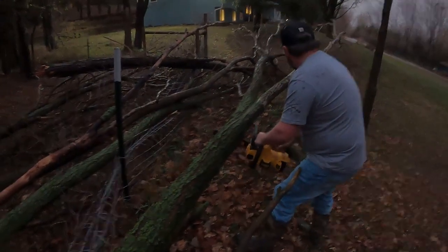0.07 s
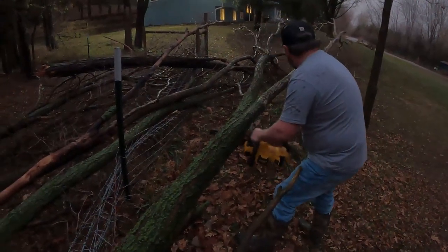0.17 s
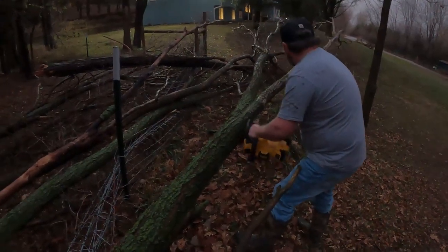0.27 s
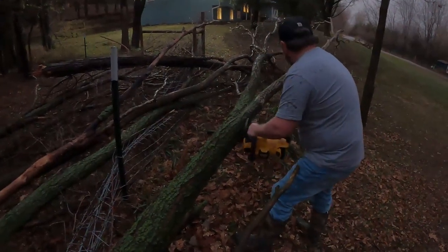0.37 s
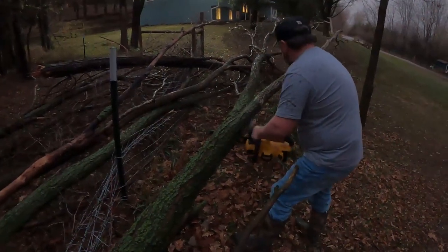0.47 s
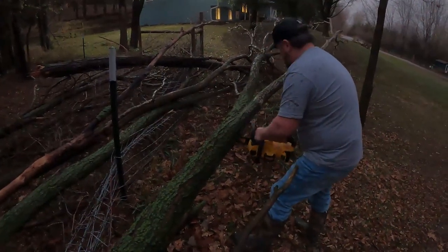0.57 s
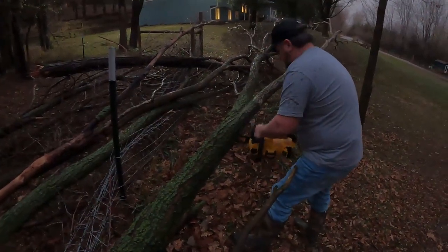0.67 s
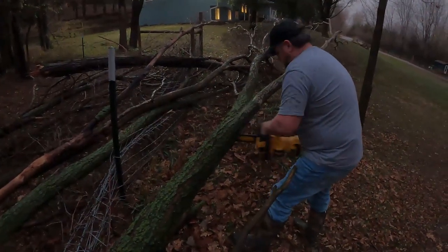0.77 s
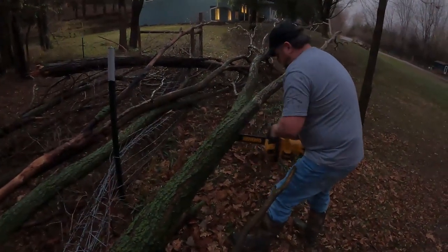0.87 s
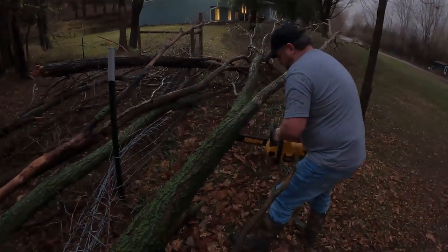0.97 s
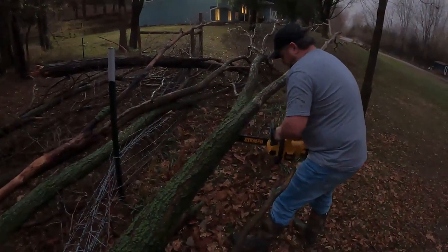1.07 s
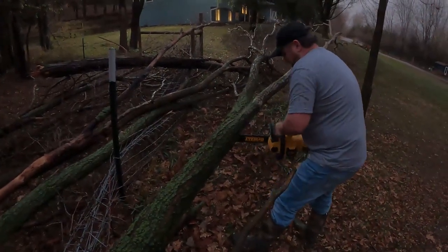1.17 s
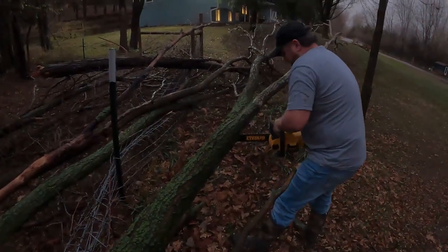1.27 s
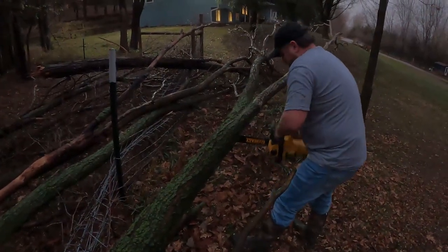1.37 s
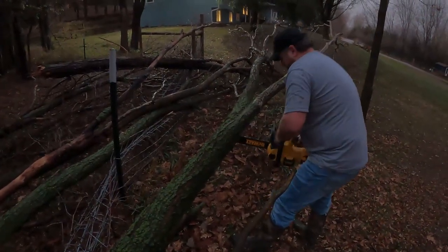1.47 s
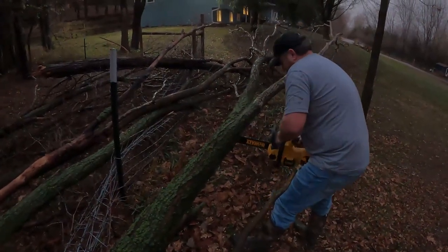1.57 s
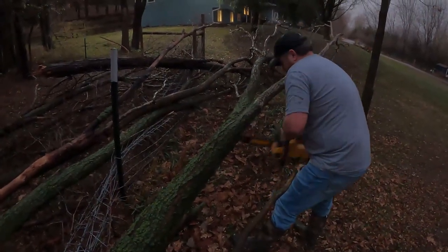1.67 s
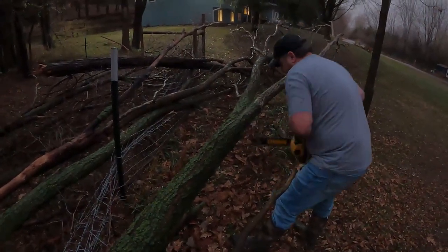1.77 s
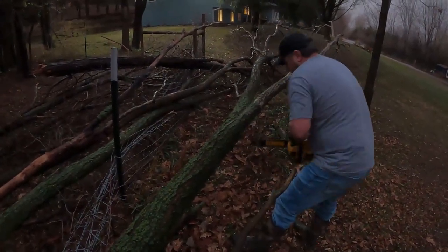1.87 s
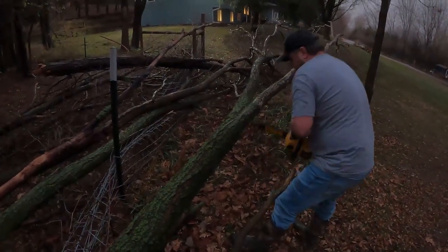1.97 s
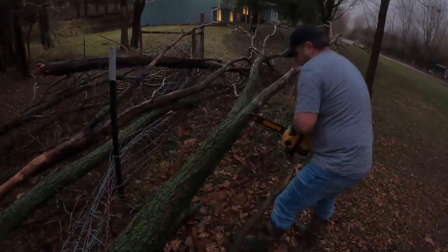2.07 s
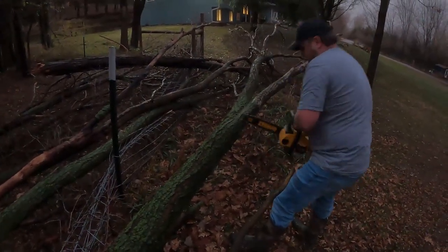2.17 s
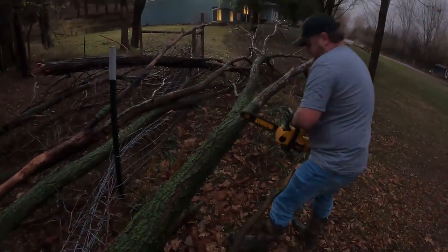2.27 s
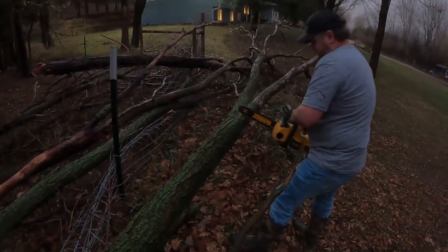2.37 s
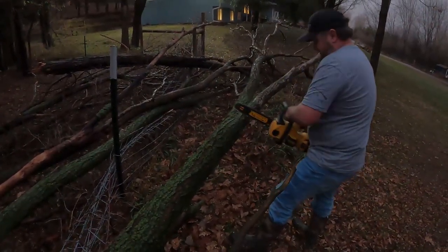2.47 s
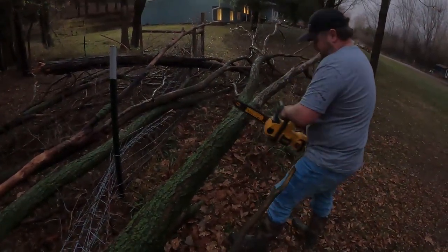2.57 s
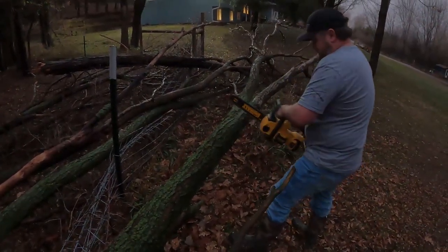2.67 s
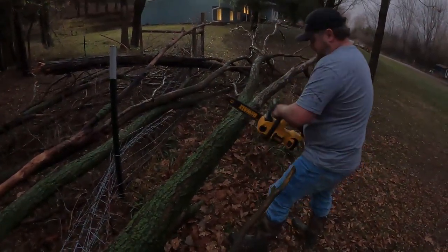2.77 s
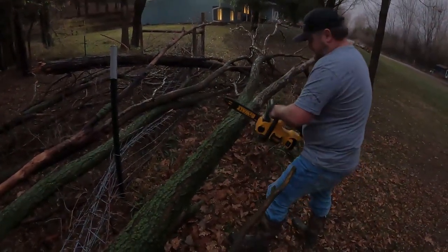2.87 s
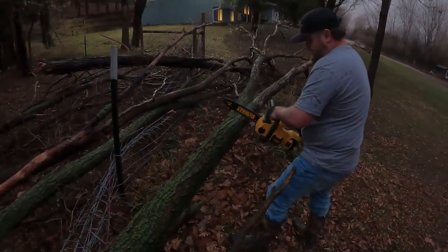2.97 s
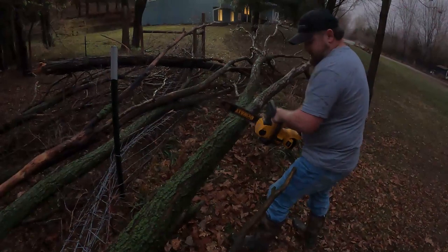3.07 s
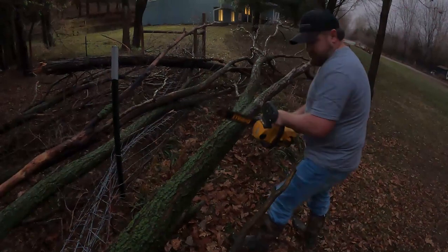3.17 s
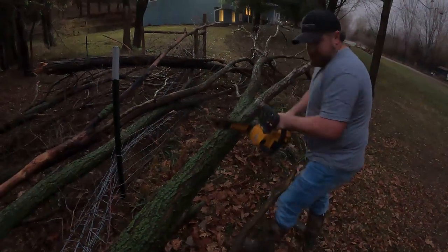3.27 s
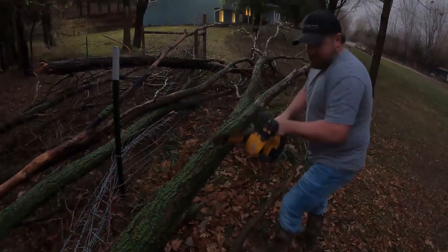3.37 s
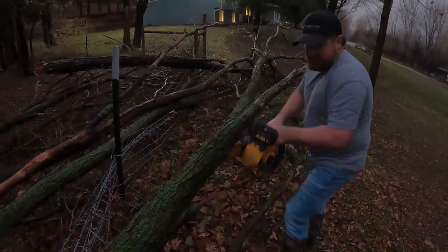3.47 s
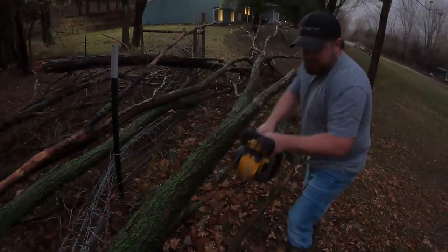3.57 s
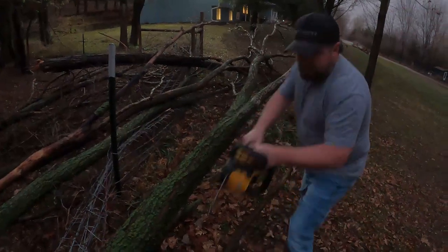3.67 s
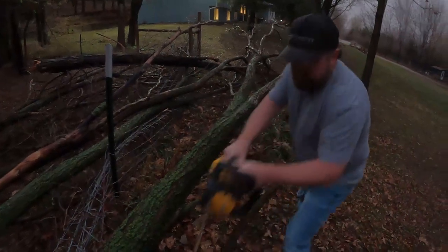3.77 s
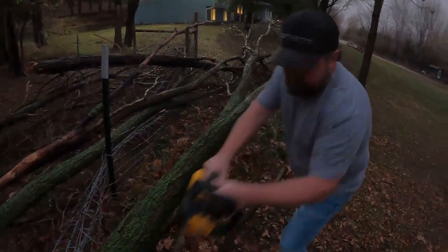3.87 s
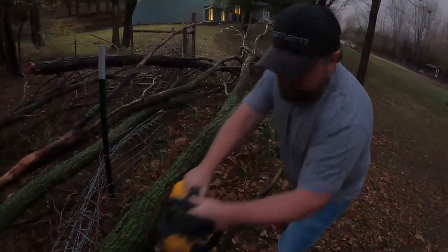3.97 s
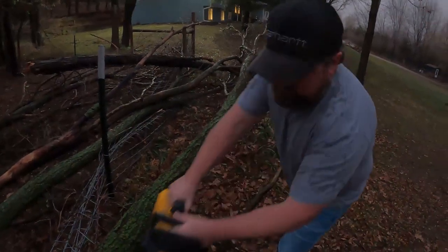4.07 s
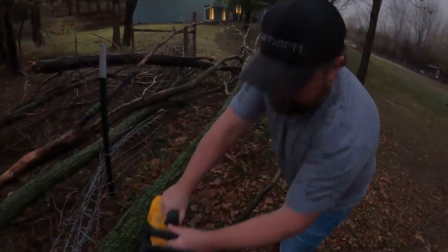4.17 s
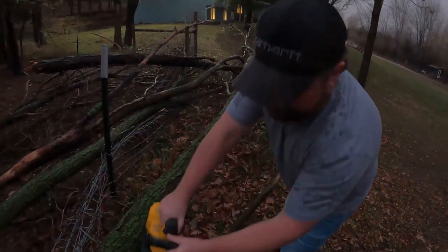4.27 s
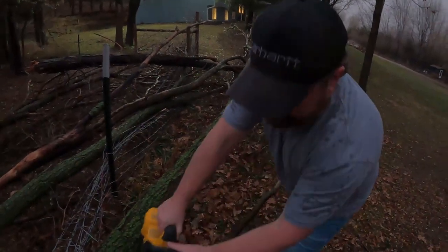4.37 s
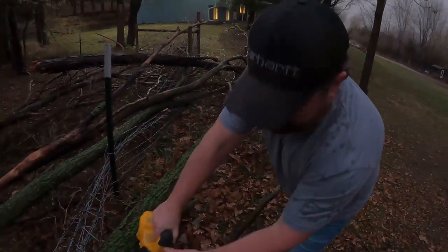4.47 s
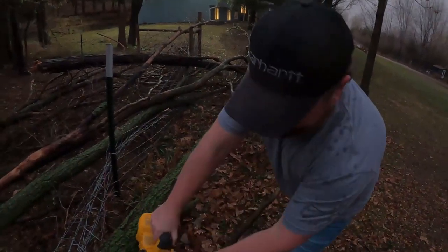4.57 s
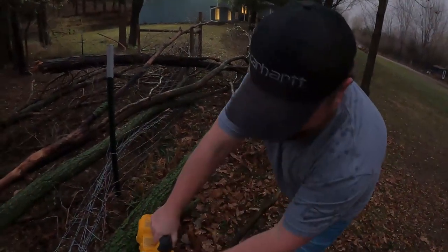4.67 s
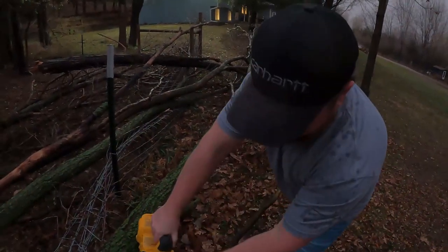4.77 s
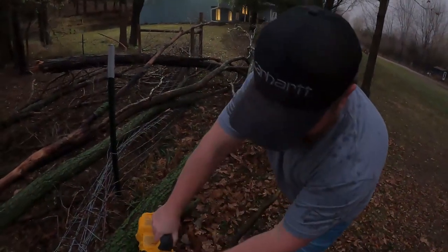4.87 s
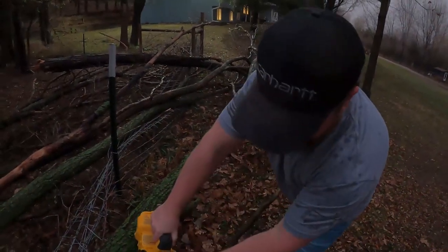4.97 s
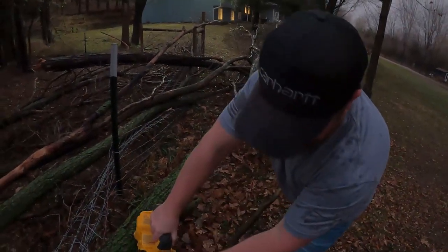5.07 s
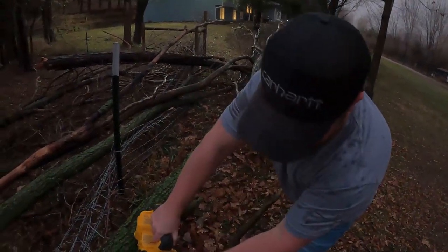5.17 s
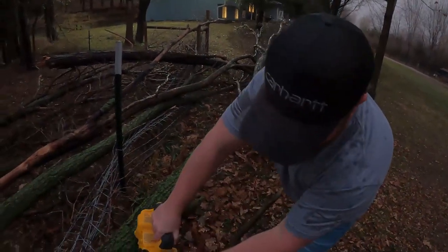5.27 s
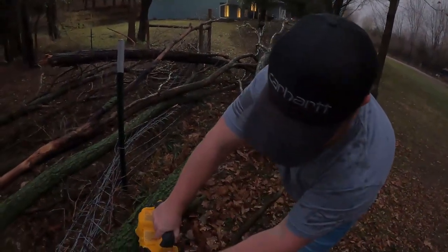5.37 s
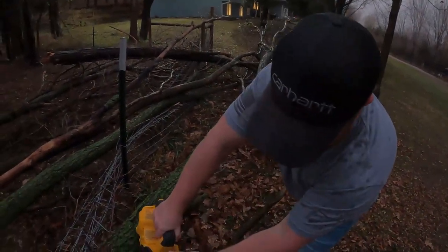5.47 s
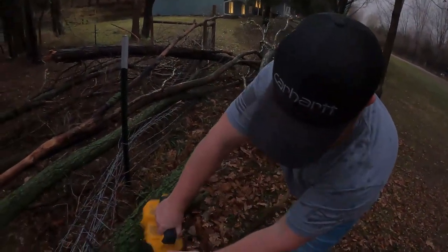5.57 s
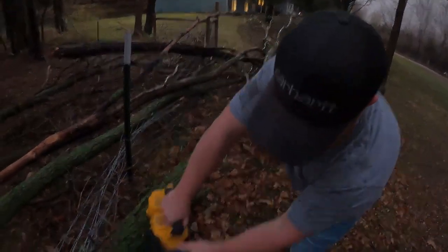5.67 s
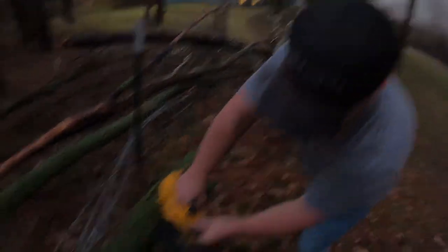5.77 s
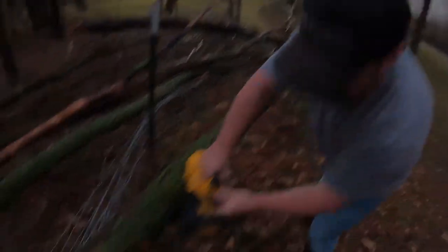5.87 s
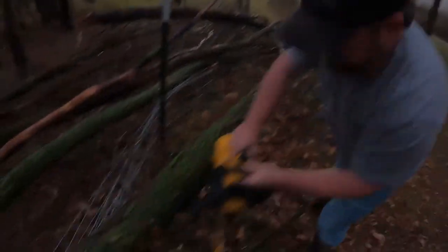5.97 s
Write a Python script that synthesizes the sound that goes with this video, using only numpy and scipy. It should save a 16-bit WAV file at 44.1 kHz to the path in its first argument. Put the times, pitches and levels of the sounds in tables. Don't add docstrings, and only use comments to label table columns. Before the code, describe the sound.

A battery chainsaw whines through twigs, runs down to quiet, blips briefly, then spins up close and bites into a thick limb.

```python
import sys
import numpy as np
from scipy import signal
from scipy.fft import rfft, irfft, next_fast_len
from scipy.io import wavfile
from scipy.ndimage import uniform_filter1d, map_coordinates

SR = 44100
rng = np.random.default_rng(int(sys.argv[2]) if len(sys.argv) > 2 else 0)


def store_wav(level_fs):
    pcm = np.round(np.clip(np.atleast_2d(level_fs), -1, 1) * 32767)
    wavfile.write(sys.argv[1], SR, pcm.T.astype(np.int16))


def undo_db(level):
    steps = np.asarray(level, float) / 20
    return 10 ** steps


N = 264591


def unit(x):
    return x / np.sqrt(np.mean(x ** 2) + 1e-20)


def along(points, hz):
    f, v = np.transpose(points)
    return np.interp(np.log(hz + 1), np.log(f + 1), v)


def curves(rows, outside=None):
    s, *cols = np.transpose(rows)
    return [np.interp(np.arange(N) / SR, s, c, outside, outside) for c in cols]


def wobble(rate):
    coarse = np.arange(0, N + 32, 32)
    knots = rng.standard_normal(int(N * rate / SR) + 4)
    return np.interp(np.arange(N), coarse, map_coordinates(knots, [coarse * rate / SR]))


def filtered(x, response):
    m = next_fast_len(N + 8192)
    return irfft(rfft(x, m) * response(np.fft.rfftfreq(m, 1 / SR)), m)[..., :N]


def cycles(hz):
    return 2 * np.pi * np.cumsum(hz) / SR


def spread(a, b, alike):
    def turn(hz):
        return np.arccos(np.clip(along(alike, hz), -1, 1)) / 2

    mid, side = filtered(np.array([a, b]), lambda hz: np.array([np.cos(turn(hz)), np.sin(turn(hz))]))
    return np.array([mid + side, mid - side])


# (frequency [Hz], density [dB per Hz])
ROAD_COLOUR = [(13, -31.5), (22, -10.5), (61, -1), (97, -7.5), (138, -9.5), (233, -14), (260, -15.5),
               (371, -22), (462, -19), (846, -22.5), (1020, -24), (1110, -22), (1210, -30.5), (15500, -75)]
# (frequency [Hz], left-right likeness [0-1])
ROAD_ALIKE = [(30, 1), (300, 0.96), (2000, 0.61), (10000, .5)]


def road():
    road_db, tyres_db = -45.5, -0.5
    drone_hz, drone_db = 134, 8
    passing = np.exp(-((np.arange(N) / SR - 2.9) / 0.99) ** 2)

    def colour(f):
        return undo_db(along(ROAD_COLOUR, f) + drone_db / (1 + ((f - drone_hz) / 10) ** 2))

    far = unit(spread(*filtered(rng.standard_normal((2, N)), colour), ROAD_ALIKE))
    hiss = filtered(far, lambda f: 1 / (1 + (110 / (f + 1)) ** 4))
    rumble_level = undo_db(5.5 * passing + 1.0 * wobble(2.5))
    hiss_level = undo_db(tyres_db + 3 * passing + 1.5 * wobble(12))
    return undo_db(road_db) * (rumble_level * (far - hiss) + hiss_level * hiss)


# (time [s], length [s], level [dB])
COOS = [
    (2.08, .17, -48),
    (2.27, .28, -57),
]


def dove():
    coo_hz = 622
    t = np.arange(N) / SR
    level = np.zeros(N)
    for s, length, db in COOS:
        level += undo_db(db) * np.sin(np.pi * np.clip((t - s) / length, 0, 1)) ** 0.27
    hz = coo_hz * (1 + 0.017 * wobble(33) + 0.0075 * wobble(50.2))
    return level * undo_db(2.4 * wobble(30.9)) * np.sin(cycles(hz))


def switching():
    standby_db, switch_db, fade_s = -95, -55.5, 0.32
    blip_s, release_s = 2.805, 3.15
    tick_s, tick_db = .047, -81
    t = np.arange(N) / SR
    after = np.clip(t - release_s, 0, None) / fade_s
    before = np.clip(release_s - t, 0, None) / fade_s
    level = undo_db(standby_db) + (t > blip_s) * undo_db(switch_db - 20 * (after + 0.5 * before))
    level = level + undo_db(tick_db - 60 * (t % tick_s) / .006 + 4 * wobble(15))
    grains = undo_db(4 * wobble(90)) * rng.standard_normal((2, N))
    return level * unit(filtered(grains, lambda f: np.exp(-((f - 12500) / 1000) ** 2)))


# (time [s], level [dB])
RUSTLES = [
    [(1.39, -63), (1.526, -66), (1.7, -82)],
    [(3.86, -66), (4.07, -61), (4.16, -49)],
]
# (frequency [Hz], density [dB per Hz])
LEAF_COLOUR = [(500, -31), (1500, -7), (3000, -8), (6000, -12), (12000, -31.5), (15700, -59)]
# (frequency [Hz], left-right likeness [0-1]); the cutting chain shares it
NEAR_ALIKE = [(60, 0.98), (500, 0.99), (2000, 0.98), (5000, 0.87), (9000, 0.87), (13000, 0.38)]


def leaves():
    level = sum(undo_db(curves(rows, outside=-120)[0]) for rows in RUSTLES)
    crackle = undo_db(3 * wobble(120)) * rng.standard_normal((2, N))
    return level * unit(spread(*filtered(crackle, lambda f: undo_db(along(LEAF_COLOUR, f))), NEAR_ALIKE))


def knocks(rows, longer):
    out, t = np.zeros(N + SR), np.arange(SR // 8) / SR
    for s, db, hz, q in rows:
        decay_s = longer * (.011 + 18 / hz)
        puff = undo_db(-60 * t / decay_s) * rng.standard_normal(len(t))
        puff[0] = 1.4
        body = signal.iirpeak(hz, max(q, .3), SR)
        ring = signal.lfilter(*body, signal.lfilter(*body, puff))
        out[round(s * SR):][:len(t)] += undo_db(db) * ring / np.abs(ring).max()
    return out[:N]


# (time [s], peak [dB], centre [Hz], sharpness Q)
FOOTFALL = [(1.788, -40, 550, 1.5), (1.796, -34, 550, 1.5), (1.799, -36, 1050, 2), (1.805, -31, 450, .8),
            (1.818, -33, 380, .8), (1.827, -35, 1000, 1.6), (1.852, -38, 900, 2), (1.863, -33, 700, .4)]


def footfall():
    return signal.lfilter(*signal.butter(4, 1300, fs=SR), knocks(FOOTFALL, longer=2))


# (time [s], peak [dB], centre [Hz], sharpness Q)
WIDE_KNOCKS = [
    (1.053, -20, 500, .4),
    (3.649, -42, 1200, .4),
]


def wide_knocks():
    return np.outer([1, -1], knocks(WIDE_KNOCKS, longer=.5))


# (time [s], peak [dB], centre [Hz], sharpness Q)
TWIGS = [(.135, -12, 1150, 2.5), (.14, -13, 2000, 2.2), (.184, -20, 660, 1.3), (1.053, -10, 699, 0.47),
         (1.248, -22.5, 4990, 0.91), (1.346, -20, 900, 4), (1.509, -35, 2300, 0.83),
         (1.538, -45.5, 2306, 1.7), (1.541, -43, 1300, 1.4), (1.554, -52, 2750, 5), (1.566, -57, 2800, 6),
         (1.678, -58, 4500, .8), (1.734, -59, 4000, 1), (1.805, -55, 4000, 1), (1.832, -56, 4000, 1),
         (1.845, -58, 4500, 1), (2.136, -52.5, 2630, 3.9), (2.606, -48.5, 1790, 3.6),
         (2.702, -41, 1350, 2.4), (2.703, -42, 600, 1.5), (2.778, -41, 1100, 2.5), (2.704, -62, 12500, 2),
         (3.396, -34, 900, 1.6), (3.536, -26, 950, 1.5), (3.567, -29, 900, 1.2), (3.649, -31, 900, .4),
         (3.712, -42, 1500, .7), (3.752, -36, 3900, 3), (3.753, -36, 1000, 1.5), (3.855, -40, 2500, 0.5),
         (3.872, -46.5, 4500, 1), (3.979, -39, 1120, 1.6), (4.002, -36, 2400, 1),
         (4.058, -24.5, 1390, 0.45), (4.055, -35, 5300, 1.1), (4.389, -20, 415, 0.56),
         (4.701, -18, 7440, 1.3), (4.827, -13, 7000, 3), (4.452, -19, 5030, 1), (5.024, -11.5, 5060, 0.88),
         (5.125, -19.5, 4500, 0.88), (5.405, -13, 7800, 1.5), (5.504, -10.5, 5980, 1.3),
         (5.559, -16, 7900, 1.8), (5.638, -16.5, 4500, 1), (5.256, -14, 7930, 1.7), (5.338, -13, 8360, 1.7),
         (5.9, -13.5, 3900, 0.75), (5.902, -6, 3300, 1.7), (5.94, -30, 200, 0.97)]


def twigs():
    return knocks(TWIGS, longer=0.76)


# (time [s], peak [dB], centre [Hz], sharpness Q)
TOOTH_BITES = [(4.453, -10, 584, 1), (4.508, -13, 608, 1.2), (4.7, -10, 579, 1.2), (4.798, -12, 813, 1.2),
               (4.862, -10, 880, 1.4), (4.989, -10.5, 624, 1.2), (5.058, -15.5, 1100, 1.2),
               (5.094, -13, 600, 1.2), (5.221, -14, 618, 1.2), (5.366, -13, 614, 1.2),
               (5.54, -12.5, 600, 1)]


def bites():
    return undo_db(-3) * knocks(TOOTH_BITES, longer=0.76)


# (time [s], level [dB])
LIMB_LEVEL = [
    (4.38, -39.5),
    (4.55, -29),
    (4.66, -26),
    (4.8, -33),
    (5.1, -36),
    (5.66, -46.5),
]


def limb():
    shake = undo_db(2.4 * wobble(60) + 1.9 * wobble(8.1)) * rng.standard_normal(N)
    mode = filtered(shake, lambda f: 1 / (1 + ((f - 129) / 12) ** 2) + 0.1 * np.exp(-((f - 135) / 50) ** 2))
    return undo_db(curves(LIMB_LEVEL, outside=-120)[0]) * unit(mode)


# (time [s], level [dB], wind-up [dB], crack top [Hz])
JERKS = [
    (2.8049, -23.5, -5, 2500),
    (4.1578, -17, 0, 4930),
]
# (frequency [Hz], level [dB], t60 [s], held to 0.035 s at most)
JERK_MODES = [
    [(640, 3, 5.0), (710, 0.5, 0.13), (1120, -4.5, 5.0), (1520, -20, 0.12), (1660, -13.5, 0.17),
     (2000, -9, 0.037)],
    [(660, -3, 0.38), (1150, 4.5, 0.024), (2239, -9.5, 0.1), (3300, -5.5, 0.079), (3760, -6.5, 0.038),
     (4500, -17, 0.077), (5800, -24, 0.054)],
]


def starts():
    out, t = np.zeros(N + SR), np.arange(-SR // 40, SR // 8) / SR
    after = t.clip(0)
    for (s, db, windup_db, crack_hz), modes in zip(JERKS, JERK_MODES):
        ring = np.zeros(len(t))
        for hz, level, t60 in modes:
            decay_db = level + rng.normal(0, 1.2) - 60 * after / min(t60, .035)
            ring += undo_db(decay_db) * np.sin(2 * np.pi * hz * after)
        burst = (t > 0) * undo_db(-60 * after / 0.037) * rng.standard_normal(len(t))
        crack = signal.lfilter(*signal.butter(3, crack_hz, fs=SR), burst)
        windup = (t < 0) * undo_db(windup_db + 1800 * t.clip(None, 0)) * np.sin(2 * np.pi * 1160 * t)
        out[round((s + t[0]) * SR):][:len(t)] += undo_db(db) * (ring + 0.94 * crack + windup)
    return out[:N]


# (time [s], length [s], from [Hz], to
# [Hz], level [dB])
SHORT_TONES = [(2.859, 0.042, 2030, 2460, -55), (2.96, 0.089, 500, 556, -37), (3.079, 0.074, 600, 745, -38),
               (3.12, .08, 500, 560, -37), (3.146, 0.053, 2300, 2300, -49), (3.24, 0.23, 1600, 1460, -56),
               (4.21, 0.087, 3550, 3450, -32.5), (4.221, .05, 1280, 1340, -33), (4.232, .05, 2850, 2920, -36),
               (4.284, 0.118, 3030, 3110, -36), (4.336, .09, 3800, 3770, -38), (5.628, 0.033, 1370, 1370, -29),
               (5.674, .07, 1400, 1620, -34), (5.8, .09, 1720, 1700, -33), (.84, .04, 1050, 1150, -27),
               (5.67, .05, 1130, 1150, -37), (5.757, 0.05, 930, 930, -32)]


def short_tones():
    t, out = np.arange(N) / SR, np.zeros(N)
    rough, flutter = 1 + .012 * wobble(90), undo_db(3 * wobble(60))
    for s, length, from_hz, to_hz, db in SHORT_TONES:
        k = slice(round(s * SR), round((s + length) * SR))
        u = np.clip((t[k] - s) / length, 0, 1)
        swell = np.sin(np.pi * u) ** .5 * flutter[k]
        hz = (from_hz + (to_hz - from_hz) * u) * rough[k]
        out[k] += undo_db(db + 3) * swell * np.sin(cycles(hz))
    return out


# (time [s], peak [dB], ring [Hz])
SLAPS = [(4.216, -34.5, 7810), (4.2281, -33.5, 7370), (4.2374, -28.5, 7510), (4.2554, -34, 7450),
         (4.2837, -29, 7670), (4.2968, -36, 7680), (4.3156, -25, 7350), (4.34, -26, 7450),
         (4.364, -27.5, 7560), (4.3854, -21.5, 6080), (4.4256, -23.5, 7480), (4.4313, -24.5, 7290),
         (4.4634, -22, 7110), (4.4848, -19.5, 8200), (4.4948, -19.5, 7350), (4.5358, -19, 7490),
         (4.5659, -17.5, 7670), (4.612, -17, 7810), (4.677, -15, 6230), (4.7375, -19, 6250),
         (4.7572, -15, 5990), (4.7955, -19, 6140), (4.8694, -19, 6020), (4.8841, -15.5, 6380),
         (4.9, -15.5, 5990), (4.9241, -17, 5920), (4.9851, -18, 7990), (5.0648, -17.5, 8150),
         (5.0968, -19.5, 7640), (5.1602, -18, 7660), (5.1935, -19.5, 7910), (5.2183, -17, 6190),
         (5.284, -17, 7000), (5.438, -16, 7680), (5.4665, -15.5, 7300), (5.5378, -16, 7110),
         (5.5956, -18, 7660), (5.6983, -18, 5830)]


def slaps():
    decay_s, level_db = .026, -4
    out, t = np.zeros(N + SR), np.arange(SR // 40) / SR
    envelope = undo_db(-60 * t / decay_s) * (1 - np.exp(-t / .0004))
    for s, db, hz in SLAPS:
        band = signal.butter(3, (.85 * hz, 1.22 * hz), "band", fs=SR)
        hiss = unit(signal.lfilter(*band, rng.standard_normal(len(t))))
        slap = envelope * (hiss + np.sin(2 * np.pi * hz * t))
        out[round(s * SR):][:len(t)] += undo_db(db + level_db) * slap
    return out[:N]


# (time [s], level [dB], how openly the bar faces the camera [dB])
CHAIN_RUNS = [
    [(0, -27, 3.5), (.7, -27, 3), (.85, -23.5, 0), (1.052, -27.5, 3), (1.062, -33.5, 4.5), (1.13, -25.5, 2),
     (1.3, -28.5, 1.5), (1.37, -36, -2), (1.42, -64, -10)],
    [(2.812, -30, -27), (2.85, -36, -21.5), (2.97, -30, -16), (3.17, -30, -12.5), (3.35, -34, -16),
     (3.52, -41.5, -7.5), (3.6, -56.5, 2), (3.85, -56.5, 0), (3.9, -61, -6)],
    [(4.165, -24.5, -2), (4.19, -34, -1.5), (4.3, -28, 0), (4.42, -28, -0.5), (4.5, -25.5, -0.5),
     (5.6, -28.5, 1.5), (5.67, -28, 2), (5.898, -28, 0), (5.91, -34, 2.5)],
]
# (time [s], gear whine [Hz], whine re chain level [dB])
MOTOR_SPEEDS = [
    [(0, 4720, -15), (.83, 4720, -12), (.895, 4450, -7), (.92, 3780, -1), (.96, 3220, -3), (1.0, 3800, -16),
     (1.07, 4550, -20), (1.22, 4560, -22), (1.4, 1500, -60)],
    [(2.8, 500, -40), (2.84, 1000, -16), (2.9, 1420, -11), (2.95, 1800, -19), (3.01, 2130, -16),
     (3.125, 2790, -20), (3.19, 3000, -32), (3.3, 2900, -70), (3.9, 1700, -70)],
    [(4.16, 700, -40), (4.27, 1760, -2), (4.7, 3440, -5), (4.95, 4220, -14), (5.04, 3640, -10),
     (5.28, 3590, -1.5), (5.62, 3530, -3), (5.68, 4500, -10), (5.79, 4800, -10), (5.84, 4820, -20)],
]
# (time [s], length [s], load [0-1], speed lost [share])
WOOD_CUTS = [(.12, .09, .5, .08), (.855, .21, .6, 0), (.19, .07, 0, .04), (.51, .1, .1, .03),
             (.86, .05, .1, .04), (1.19, .25, .15, 0), (2.86, .09, .8, 0), (3.06, .19, .35, 0),
             (1.065, .13, .08, 0), (4.24, .15, .25, 0), (4.375, .06, .1, .08), (4.375, 1.295, 1, 0),
             (4.48, .06, .1, .05), (4.58, .11, .1, .055), (4.72, .07, .1, .06), (5.9, .2, .15, .1)]
FREE_HZ = 4750
CHATTER_HZ = 58.95


def drive():
    bite_s = .02
    t = np.arange(N) / SR
    load, lost = np.zeros(N), np.zeros(N)
    for s, length, cut_load, cut_lost in WOOD_CUTS:
        bite = np.clip(np.minimum(t - s, s + length - t) / bite_s, 0, 1)
        load += cut_load * bite
        lost += cut_lost * bite
    load = np.clip(load, 0, 1)
    whine_hz, whine_db = curves(sum(MOTOR_SPEEDS, []))
    grabs = .003 * np.sqrt(load) * wobble(16)
    whine_hz = whine_hz * (1 - lost + grabs)
    level_db = curves(sum(CHAIN_RUNS, []))[0]
    hum_db = level_db - 7 - 70 * load - 150 * np.clip(.94 - whine_hz / FREE_HZ, 0, 1)
    return whine_hz, level_db + whine_db, hum_db, load


# (share of the whine pitch, first run re hum [dB], last run re hum [dB])
ORDERS = [(0.0626, -10.5, -4.5), (0.0823, -14.5, -23), (0.123, -14, -10), (.145, -5.5, -25),
          (0.1654, 2.5, -14), (0.2477, -4, -3), (0.33, -4, 2), (.48, -4, -10), (0.4928, 0, -6),
          (.94, -3, -20)]
# (frequency [Hz], width [Hz], gain [dB])
CASING_MODES = [(1300, 200, 3), (2080, 200, 4), (2450, 200, 4), (3000, 200, 3), (3330, 250, 5),
                (3560, 200, 3), (3850, 150, -6), (4350, 250, 3)]
# (share of the whine pitch, level [dB])
WHINE_STRANDS = [
    (.9375, -10),
    (1, 0),
    (1.0625, -5),
    (2, -12),
]


def motor(whine_hz, whine_db, hum_db, load):
    chatter = np.cos(cycles(2 * CHATTER_HZ * (1 + .15 * wobble(20))))
    torn = 1 + load * (.017 * chatter + .017 * wobble(260)) + .004 * wobble(60)
    out = np.zeros(N)
    for share, db in WHINE_STRANDS:
        hz = share * whine_hz
        lift_db = sum(g / (1 + (2 * (hz - c) / w) ** 2) for c, w, g in CASING_MODES)
        broken_db = 1.0 * wobble(22) + 3 * wobble(130)
        side_db = db - 11 * (1 - load) * (share != 1)
        out += undo_db(whine_db + side_db + lift_db + broken_db) * np.sin(cycles(hz * torn))
    late = np.arange(N) > N // 2
    for share, first_db, last_db in ORDERS:
        db = hum_db + 1.5 + np.where(late, last_db, first_db)
        db = db + (1 + 2 * share) * wobble(22) + 3 * share * wobble(70)
        out += undo_db(db) * np.sin(cycles(share * whine_hz * (1 + 0.008 * wobble(60) + .003 * wobble(8))))
    return out


def rattle(whine_hz, load):
    beat_db = 1.5 * (1 - load) * np.cos(cycles(.0624 * whine_hz))
    chatter_db = 2 * load * np.cos(cycles(CHATTER_HZ * (1 + 0.1503 * wobble(9))))
    grains_db = 1.0 * wobble(350) + 0.69 * wobble(90) + 0.29 * wobble(25)
    strike_level = undo_db(3.5 * rng.exponential(size=N).clip(0, 2.5))
    strikes = (rng.random(N) < .02) * strike_level * rng.standard_normal(N)
    return undo_db(beat_db + chatter_db + grains_db) * (rng.standard_normal((2, N)) + 1.03 * strikes)


# (frequency [Hz], density [dB per Hz])
CHAIN_COLOURS = [
    [(53, -51.5), (90, -22), (425, -15.5), (575, -3.5), (640, -12), (761, -5.5), (848, -14), (965, -9),
     (1390, -10.5), (2340, -7.5), (4370, -10.5), (11500, -21), (15600, -41.5)],
    [(53, -51), (90, 15), (151, -22), (200, -4), (399, -7), (539, -1.5), (848, -1.5), (1120, -6),
     (1690, -16.5), (3920, -15.5), (9290, -34), (12600, -39), (15600, -45.5)],
    [(53, -38), (90, -22), (124, -13), (161, -10.5), (600, -7.5), (745, -4), (2190, -5), (2840, -8),
     (3520, -4.5), (5420, -16), (7810, -16), (12300, -27), (15600, -46)],
]
# (frequency [Hz], width [Hz], height over the noise [dB])
CHAIN_RINGS = [
    [(984, 290, 11.6), (2300, 120, 2.7), (3590, 500, 2.2), (4380, 200, 1.1)],
    [(502, 110, 5.6), (1129, 78, 8.6)],
    [(3145, 497, 1), (592, 147, 9.6), (2184, 140, 3.9), (1008, 430, 5.9), (1720, 82, 0.45),
     (5980, 110, 4.1), (7710, 320, 3.4)],
]
# (frequency [Hz], left-right likeness [0-1])
BRANCH_ALIKE = [(60, 0.84), (1400, 0.97), (3100, .9), (6800, 0.75), (13000, .6)]


def chain(whine_hz, load):
    fizz_dbs, wood_dbs = (-13.5, 3, -6.5), (-19, -25.5, -16)
    out, links = np.zeros((2, N)), rattle(whine_hz, load)

    def below(f, c):
        return 1 / (1 + (f / c) ** 8)

    def bands(f):
        a, b, c = below(f, 400), below(f, 1500), below(f, 5500)
        return np.sqrt([a, b - a, c - b, 1 - c])

    for rows, colour, rings, fizz_db, wood_db in zip(CHAIN_RUNS, CHAIN_COLOURS, CHAIN_RINGS, fizz_dbs, wood_dbs):
        level_db, open_db = curves(rows)
        end = rows[-1][0] if rows is not CHAIN_RUNS[-1] else N / SR
        on = uniform_filter1d(curves([(rows[0][0], 1), (end, 1)], outside=0)[0], size=400)
        fizz_db = fizz_db + 1.44 * open_db + 6.5 * np.log2(whine_hz / FREE_HZ) + 6.5 * load

        def response(f):
            peaks_db = sum(db / (1 + (2 * (f - c) / w) ** 2) for c, w, db in rings)
            return undo_db(along(colour, f) + peaks_db) * bands(f)

        layers = filtered(links[:, None], response)
        for k, db in enumerate([wood_db + 15.5 * load, 0, open_db, fizz_db]):
            out += on * undo_db(level_db + db - 1.5) * layers[:, k] / np.std(layers[0, k][on > .5])
    return np.where(np.arange(N) < N // 3, spread(*out, BRANCH_ALIKE), spread(*out, NEAR_ALIKE))


def echo(near):
    t = np.arange(SR // 6) / SR
    tail = rng.standard_normal((2, len(t))) * undo_db(-60 * t / 0.081) * (t > .004)
    return undo_db(-17.5) * signal.fftconvolve(near[None], tail / np.linalg.norm(tail[0]), axes=1)[:, :N]


# (frequency [Hz], left lead [rad])
PORT_LEAD = [(60, 0.1), (700, -0.14), (2900, -0.72), (5800, -.3), (10600, -0.5), (15000, 0)]
# (frequency [Hz], left-right [dB])
PORT_TILT = [(100, -0.7), (2400, -0.5), (4400, -0.5), (8100, 3), (15000, -3)]
# (time [s], left-right [dB])
BALANCE = [(0.0, -1.0), (1.62, -1.5), (1.77, 0), (3.23, -0.5), (5.38, 2), (6.0, 1)]


def at_ports(saw):
    saw = filtered(saw, lambda f: np.exp(.5j * np.outer([1, -1], along(PORT_LEAD, f))))
    facing = filtered(saw, lambda f: undo_db(np.outer([.5, -.5], along(PORT_TILT, f))))
    saw = np.where(np.arange(N) > 4.1 * SR, facing, saw)
    return saw * undo_db(np.outer([.5, -.5], curves(BALANCE)[0]))


def scene():
    surroundings = road() + dove() + switching() + leaves() + wide_knocks()
    whine_hz, whine_db, hum_db, load = drive()
    wood = footfall() + twigs() + bites() + limb()
    near = wood + starts() + short_tones() + slaps() + motor(whine_hz, whine_db, hum_db, load)
    return at_ports(near + echo(near) + chain(whine_hz, load)) + surroundings


# (time [s], width in the bass [dB], above [dB])
IMAGE_WIDTH = [
    (1.35, 0, 0),
    (1.6, -16, -3),
    (1.95, -45, -10),
    (2.79, -45, -10),
    (2.81, -24, -2),
    (3.2, -13, 0),
    (3.9, -8, 0),
    (4.2, -3, 0),
    (4.6, 0, 0),
]


def narrowed(x):
    mid, side = (x[0] + x[1]) / 2, (x[0] - x[1]) / 2
    low = filtered(side, lambda f: 1 / (1 + (f / 1600) ** 6))
    low_db, high_db = curves(IMAGE_WIDTH)
    side = undo_db(low_db) * low + undo_db(high_db) * (side - low)
    return np.array([mid + side, mid - side])


def top_cut(x):
    return signal.sosfilt(signal.butter(12, 15730, fs=SR, output="sos"), x)


def record(dry):
    dry = filtered(narrowed(dry), lambda f: 1 / np.sqrt(1 + (f / 15000) ** 24))
    rounded = dry / (1 + np.abs(dry / .6) ** 4) ** .25
    return top_cut(rounded)


dry = scene()
out = record(dry)
store_wav(out)
```